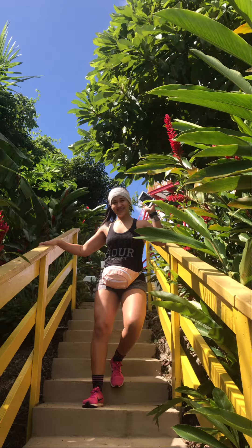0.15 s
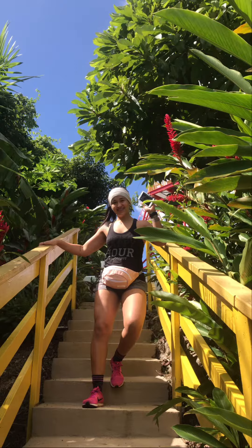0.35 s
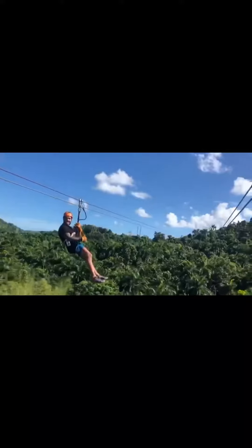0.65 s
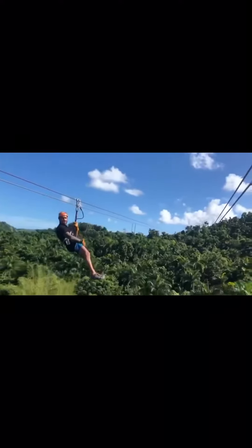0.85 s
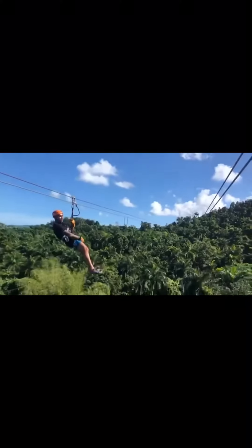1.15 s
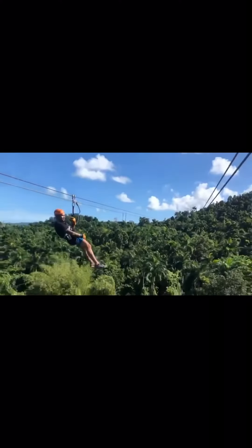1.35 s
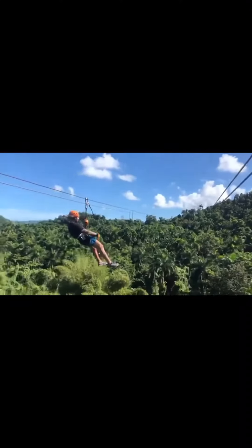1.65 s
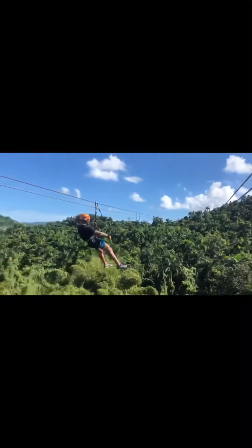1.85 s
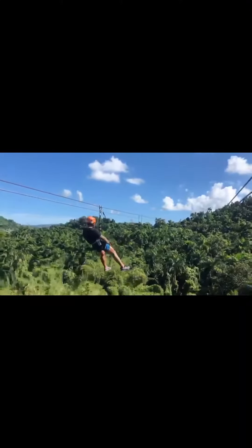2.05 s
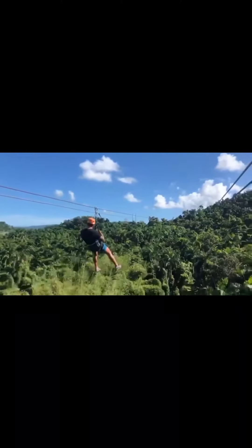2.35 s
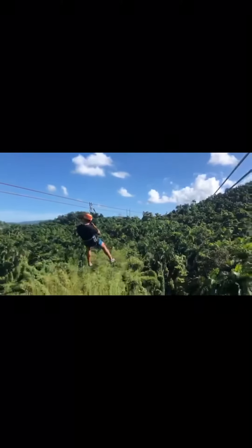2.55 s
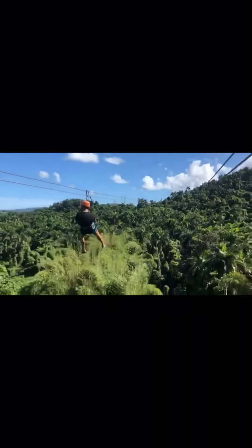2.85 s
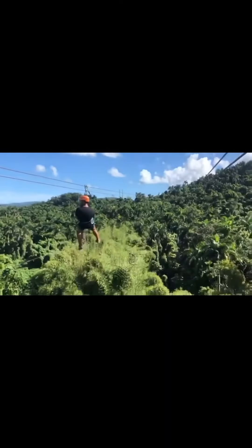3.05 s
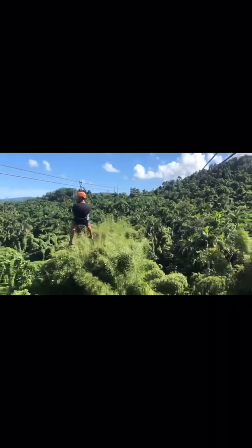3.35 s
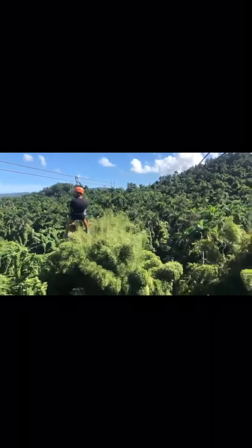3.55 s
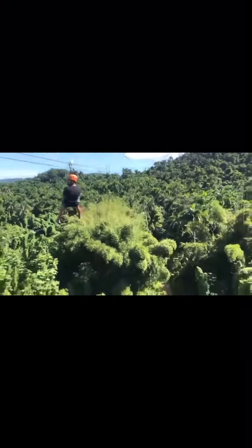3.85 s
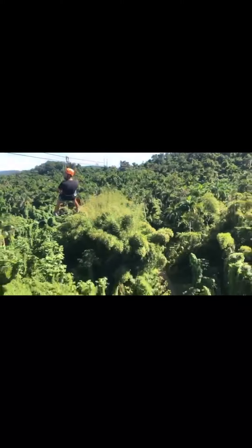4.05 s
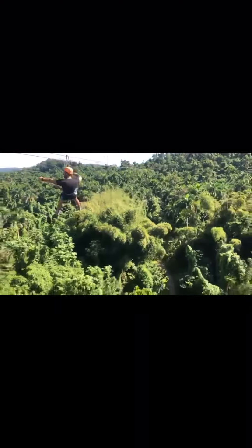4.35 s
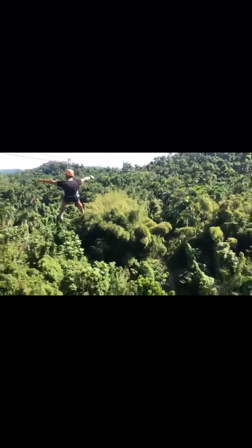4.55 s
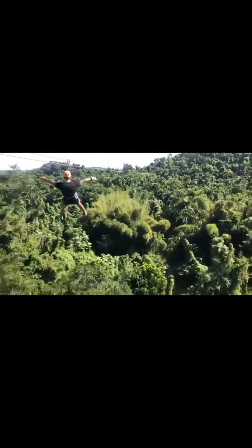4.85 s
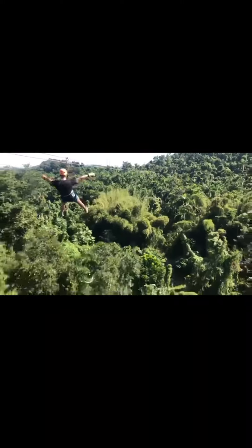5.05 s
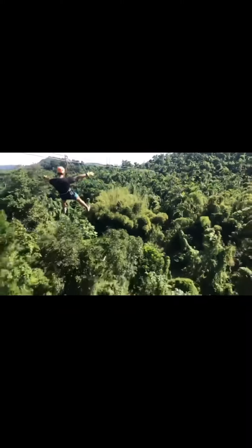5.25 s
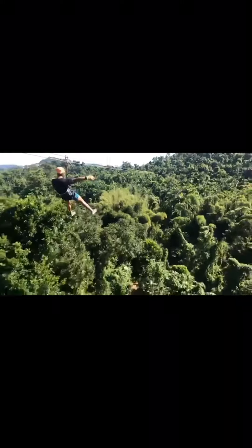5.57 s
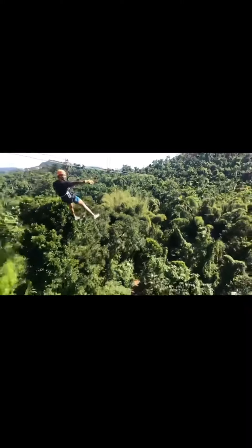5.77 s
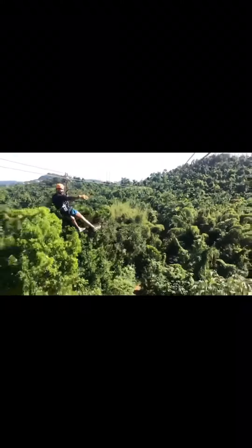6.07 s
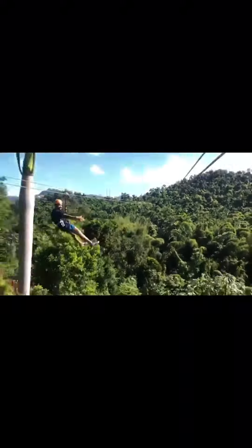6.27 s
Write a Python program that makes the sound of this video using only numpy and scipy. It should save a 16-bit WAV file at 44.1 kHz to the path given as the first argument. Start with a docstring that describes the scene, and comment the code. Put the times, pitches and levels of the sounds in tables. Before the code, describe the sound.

After about half a second of silence, the sound cuts in on a zipline trolley already running along a steel cable outdoors, close to the microphone. Its wheels make a bright, continuous hiss with a gritty, fluttering metallic ring. A thin, throbbing whine sits beneath the hiss and sinks slowly in pitch from start to finish as the trolley slows. Rushing air adds a low, lumpy rumble and hits the microphone with short, irregular thumps. The strongest come between about 2 and 2.7 seconds, around 3.5 seconds and near 4.8 seconds. The metallic grinding grows slightly louder at about 2 seconds and again around 4 seconds. The wind drops briefly near 6 seconds and then returns, while the wheels turn a little rougher and keep running until the end at about 6.4 seconds.

```python
"""High over a forest, a rider hears a zipline trolley run along its steel cable, starting mid-ride.
Its two wheels hiss on the cable and make the metal ring. Rolling over the twisted strands, they
whine at slightly different pitches, so the sound throbs, and it sinks as the trolley slows.
Rushing air rumbles on the microphone, and its swirls (eddies) hit it with short thumps."""
import sys
import numpy as np
from scipy import signal
from scipy.fft import rfft, irfft, next_fast_len
from scipy.io import wavfile

SR = 44100
rng = np.random.default_rng(int(sys.argv[2]) if len(sys.argv) > 2 else 0)


def wrap_up_sound(samples):
    """Save the sound to the file named by the first command line argument, as 16-bit audio."""
    columns = np.atleast_2d(samples).T
    # keep every value between -1 and 1, then stretch to whole-number steps
    tamed = np.clip(columns, -1, 1)
    steps = np.round(tamed * 32767).astype(np.int16)
    wavfile.write(sys.argv[1], SR, steps)


N = 282681
START_S = 0.521   # silence until here

# How strong the rushing air is: time_s, level_db
WIND_STRENGTH = [(0.54, -41.5), (1.1, -43.5), (1.8, -39.5), (2.7, -39.5), (2.97, -42), (3.55, -39.5),
                 (4.04, -45.5), (4.45, -41), (5.1, -42), (5.25, -47.5), (5.85, -42.5), (6.04, -56),
                 (6.21, -48.5), (6.3, -40)]
# How the wind's rumble is spread from low to high: pitch_hz, level_db
RUMBLE_SPECTRUM = [(20, -42), (35, -30), (50, -12.5), (70, -5.5), (100, -3), (170, -4), (300, -9),
                   (450, -15.5), (750, -18), (1100, -30), (2000, -48)]


def rolling_wheels(ring_trim_db=-0.23, chatter_hz=39.7, grit_hz=500, rough_from_s=6.1):
    """The wheels grind along the cable: a hiss and ringing metal, both shaken by uneven pressure."""
    # How hard the wheels grind: time_s, level_db
    grinding = [(0.55, -23), (0.75, -22), (1.45, -23.5), (2.08, -20), (2.95, -21), (3.25, -20), (3.9, -20),
                (4.12, -18.5), (5.3, -19.5), (6.2, -19)]
    # The fine hiss of steel on steel: pitch_hz, level_db
    hiss_spectrum = [(500, -29.5), (1100, -21), (1800, -14.5), (2300, -10), (3200, -15.5), (4900, -12),
                     (6700, -1), (7700, -3.5), (8800, 2), (9500, 2), (10500, -1), (12800, -3),
                     (14400, -1.5), (15200, -9)]
    # Narrow ringing peaks in that hiss: pitch_hz, width_hz, level_db
    hiss_peaks = [(8090, 85, -1.5), (9660, 170, 2), (14670, 200, 0.5)]
    # Pitches at which the wheels and side plates ring: pitch_hz, width_hz, level_db
    trolley_peaks = [(2680, 335, -8), (3646, 320, -7), (4100, 410, -4.5), (4610, 173, 1), (5120, 52, 3),
                     (5480, 390, 1.5), (5950, 384, 2.5)]
    grind_db, = curves_in_time(grinding)
    hiss_db = -15.5 + 0.38 * (grind_db + 20)   # the hiss only partly follows the grinding
    noise = shimmering_noise()
    hiss = from_db(hiss_db) * unit_level(shape_tone(noise, hiss_spectrum) + ringing(noise, hiss_peaks))
    # Small metal parts give off little sound below their lowest ringing pitch.
    low_cut = signal.butter(3, 2000, "high", fs=SR, output="sos")
    metal = signal.sosfilt(low_cut, ringing(noise, trolley_peaks))
    ring = from_db(grind_db + ring_trim_db) * unit_level(metal)
    # The chatter deepens by 5 dB a second on the last stretch.
    chatter_db = 0.3 + 5 * np.maximum(np.arange(N) / SR - rough_from_s, 0)
    pressure = from_db(chatter_db * wander(chatter_hz) + 0.58 * wander(grit_hz))
    return pressure * (hiss + ring)


def shimmering_noise(shimmer_db=-6.0, tone_fade_s=0.019, count=7000):
    """Noise with a faint, flickering shimmer of very short tones at random pitches."""
    start, pitch, phase = rng.random((count, 3)).T[:, :, None]
    age = np.arange(SR // 40)   # in samples
    tones = np.exp(-age / (tone_fade_s * SR)) * np.sin(np.pi * pitch * age + 2 * np.pi * phase)
    positions = (start * N).astype(int) + age
    shimmer = np.bincount(positions.ravel(), tones.ravel(), N)[:N]   # add each tone in its place
    return unit_level(rng.standard_normal(N) + from_db(shimmer_db) * unit_level(shimmer))


def ringing(noise, peaks):
    """Rubbing keeps metal ringing, each pitch driven by a different stretch of the noise."""
    sound = np.zeros(N)
    for pitch_hz, width_hz, level_db in peaks:
        decay = np.exp(-np.pi * width_hz / SR)
        feedback = [1, -2 * decay * np.cos(2 * np.pi * pitch_hz / SR), decay * decay]
        push = np.roll(noise, rng.integers(N))
        sound += from_db(level_db) * (1 - decay * decay) / 2 * signal.lfilter([1, 0, -1], feedback, push)
    return sound


def whine(pitch_gap_hz=20):
    """Two wheels sound a little apart in pitch, so they throb; the quieter one runs less evenly."""
    # The trolley's speed, as strands crossed each second: time_s, pitch_hz
    speed = [(0.55, 1517), (1.3, 1504), (1.95, 1471), (2.6, 1450), (3.2, 1413), (4.3, 1356), (5.3, 1315),
             (6.38, 1269)]
    # The tone swells as it glides through this broad peak: centre_hz, half_width_hz, top_db
    tone_peak = (1430, 130, -42.5)
    # The peak for the tone an octave higher: centre_hz, half_width_hz, top_db
    octave_peak = (2790, 180, -38)
    pitch_hz, = curves_in_time(speed)
    tone_db = level_near_peak(pitch_hz, tone_peak)
    octave_db = level_near_peak(2 * pitch_hz, octave_peak)
    first = wheel_tone(pitch_hz, tone_db, octave_db, wobble_hz=1.78)
    second = wheel_tone(pitch_hz + pitch_gap_hz, tone_db - 5.5, octave_db - 9, wobble_hz=6.06)
    return first + second


def wheel_tone(pitch_hz, tone_db, octave_db, wobble_hz, flutter_db=1.0, octave_flutter_db=3.0):
    """One wheel bumps over the twisted strands: a slightly unsteady tone and its rougher octave."""
    phase = 2 * np.pi * np.cumsum(pitch_hz + wobble_hz * wander(27.7)) / SR
    tone = from_db(tone_db + flutter_db * wander(21)) * np.sin(phase)
    octave = from_db(octave_db + octave_flutter_db * wander(35)) * np.sin(2 * phase)
    return np.sqrt(2) * (tone + octave)


def wind_thumps(kick_s=0.00067, rise_s=0.0022, thud_s=0.011, slap_s=0.0069, tail_s=0.032):
    """Each eddy hits the microphone: a quick pressure kick, a thud, a higher slap and a rumbling tail."""
    # Large swirls of air bursting on the microphone: time_s, strength_db, brightness_db
    large_eddies = [(0.671, -19, -3.5), (0.751, -24, -18), (0.861, -23, -13), (1.254, -17.5, -8),
                    (1.435, -23.5, -9), (1.581, -16, -11), (1.65, -24.5, -7), (1.723, -17.5, -11),
                    (1.779, -19, -7), (1.812, -17, -6), (2.08, -12, -13), (2.132, -12.5, -6.5),
                    (2.368, -16, -8), (2.398, -14.5, -12), (2.51, -19, -5), (2.687, -16, -0.5),
                    (2.864, -21.5, -2.5), (3.43, -20.5, -7), (3.475, -12.5, -10), (3.537, -17, -6),
                    (3.571, -18.5, -5.5), (3.89, -21, -6.5), (3.968, -22, -9), (4.511, -17.5, -10),
                    (4.654, -24, -12), (4.844, -14.5, -5.5), (5.017, -23, -9), (5.135, -17.5, -12),
                    (5.561, -23, -13), (5.747, -20.5, -14), (6.105, -21, -18)]
    # The dull thud of an eddy: pitch_hz, level_db
    thud_spectrum = [(30, -35), (70, -14), (130, -6), (300, 0.5), (450, -6.5), (700, -16), (1500, -58)]
    # Its brighter slap: pitch_hz, level_db
    slap_spectrum = [(150, -13), (400, -4), (700, 2.5), (1000, -6.5), (1400, -16.5), (2500, -46)]
    t = np.arange(N) / SR
    thud_noise, slap_noise, tail_noise = (
        unit_level(shape_tone(rng.standard_normal(N), spectrum))
        for spectrum in (thud_spectrum, slap_spectrum, RUMBLE_SPECTRUM))
    kick, thud, slap, tail = np.zeros((4, N))
    for time_s, strength_db, brightness_db in np.vstack([large_eddies, small_eddies()]):
        size, direction = rng.standard_normal(2)
        near = slice(int((time_s - .05) * SR), int((time_s + .15) * SR))
        age = t[near] - time_s
        passing = age / (kick_s * from_db(2 * size))   # smaller eddies pass faster
        swing = np.sign(direction) * passing * np.exp((1 - passing ** 2) / 2)
        kick[near] += from_db(strength_db - 7.5) * swing
        swell = from_db(strength_db) * np.exp(np.minimum(age, 0) / rise_s)
        after_s = np.maximum(age, 0)
        thud[near] += swell * np.exp(-after_s / thud_s) * from_db(-10)
        slap[near] += swell * np.exp(-after_s / slap_s) * from_db(brightness_db - 4)
        tail[near] += swell * np.exp(-after_s / tail_s) * from_db(-22)
    return kick + thud * thud_noise + slap * slap_noise + tail * tail_noise


def small_eddies(count=120, typical_gap_s=1 / 12, spread_db=0.9):
    """Small swirls come at uneven times, and are stronger when the wind is stronger."""
    gap, size, brightness = rng.standard_normal((count, 3)).T
    time_s = START_S + np.cumsum(np.exp(gap / 2)) * typical_gap_s
    wind_db = np.interp(time_s, *np.transpose(WIND_STRENGTH))
    strength_db = wind_db + 12.5 + spread_db * size
    brightness_db = -4.5 + spread_db * brightness
    return np.transpose([time_s, strength_db, brightness_db])[time_s < N / SR]


def wind_rumble(boost_db=3.5, lumps_db=3.5, lumps_hz=35):
    """Air churning over the microphone's opening makes a low, lumpy noise."""
    wind_db, = curves_in_time(WIND_STRENGTH)
    churning = rng.standard_normal(N) * from_db(lumps_db * wander(lumps_hz))
    return from_db(wind_db + boost_db) * unit_level(shape_tone(churning, RUMBLE_SPECTRUM))


def from_db(db):
    """Turn decibels into a number to multiply by."""
    return 10 ** (np.asarray(db) / 20)


def unit_level(x):
    """Scale a signal so that its average level (rms) is 1."""
    return x / np.sqrt(np.mean(x ** 2) + 1e-20)


def curves_in_time(rows):
    """Join a table's timed points with straight lines, giving a value at every sample."""
    time_s, *columns = np.transpose(rows)
    return [np.interp(np.arange(N) / SR, time_s, column) for column in columns]


def wander(rate_hz):
    """A smooth random wobble of typical size 1; a higher rate makes it quicker."""
    step, settle = 40, 2000   # one point every 40 samples; the first 2000 points are dropped
    decay = np.exp(-2 * np.pi * step * rate_hz / SR)
    noise = rng.standard_normal(N // step + settle + 2)
    slow = signal.lfilter([1], [1, -2 * decay, decay * decay], noise)[settle:]
    return np.interp(np.arange(N) / step, np.arange(len(slow)), unit_level(slow))


def shape_tone(x, spectrum):
    """Turn each pitch up or down by a table of pitch_hz, level_db."""
    size = next_fast_len(N)
    pitch_hz, level_db = np.transpose(spectrum)
    every_hz = np.maximum(np.arange(size // 2 + 1) * SR / size, 1)
    gain = from_db(np.interp(np.log(every_hz), np.log(pitch_hz), level_db))
    return irfft(rfft(x, size) * gain, size)[:N]


def level_near_peak(pitch_hz, peak):
    """A tone's level in dB: the nearer it is to the peak's centre, the louder."""
    centre_hz, half_width_hz, top_db = peak
    return top_db - 10 * np.log10(1 + ((pitch_hz - centre_hz) / half_width_hz) ** 2)


def scene():
    """Trolley and wind reach one microphone, which feeds both channels."""
    mono = rolling_wheels() + whine() + wind_rumble() + wind_thumps()
    return np.array([mono, mono])


def record(dry, low_cut_hz=48, high_cut_hz=15700):
    """The sound switches on suddenly; the deepest bass and the highest treble are cut."""
    switched_on = np.arange(N) / SR >= START_S
    low_cut = signal.butter(4, low_cut_hz, "high", fs=SR, output="sos")
    high_cut = signal.ellip(12, .1, 90, high_cut_hz, fs=SR, output="sos")
    return signal.sosfilt(high_cut, signal.sosfilt(low_cut, dry) * switched_on)


dry = scene()
out = record(dry)
wrap_up_sound(out)
```